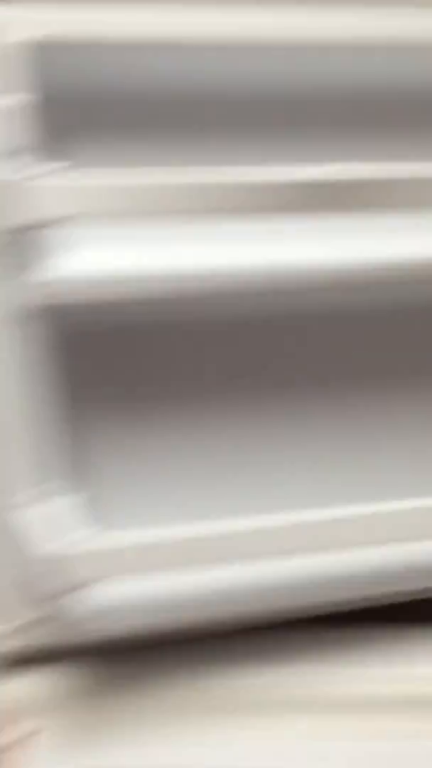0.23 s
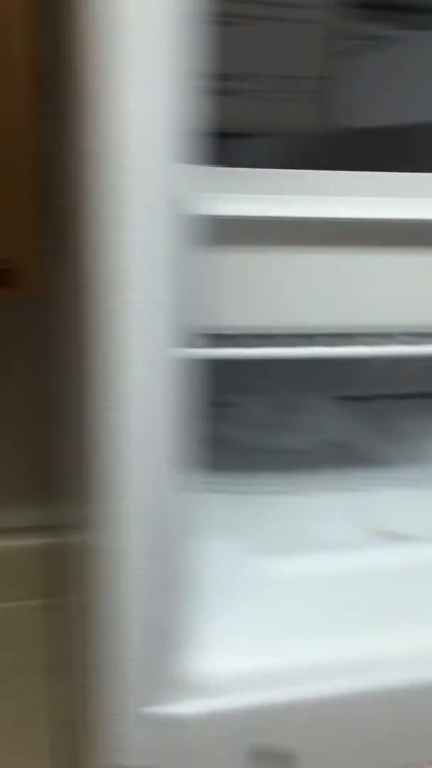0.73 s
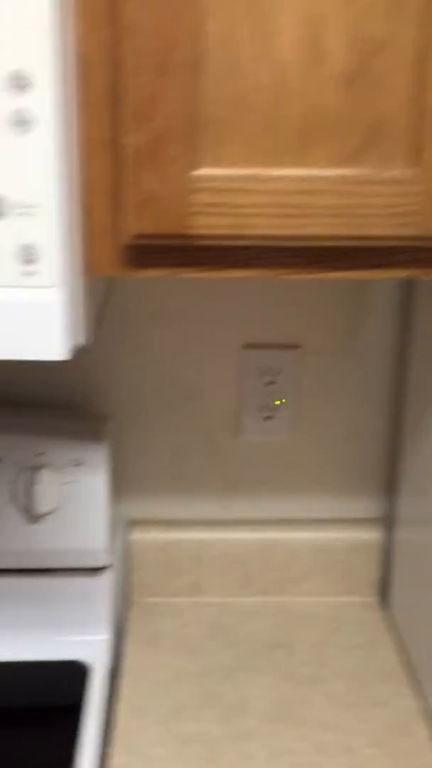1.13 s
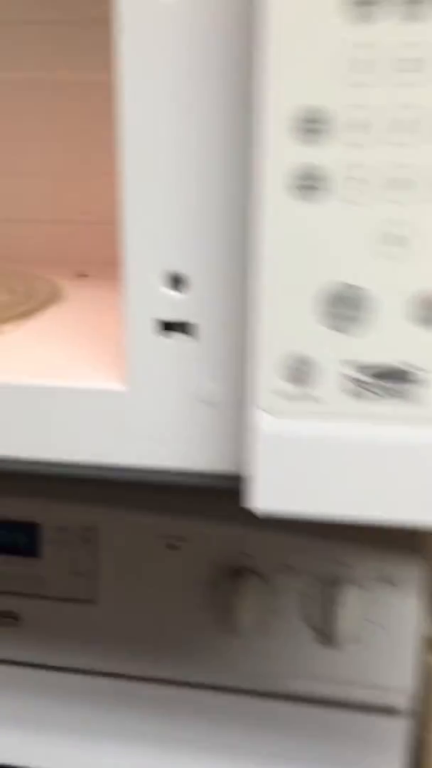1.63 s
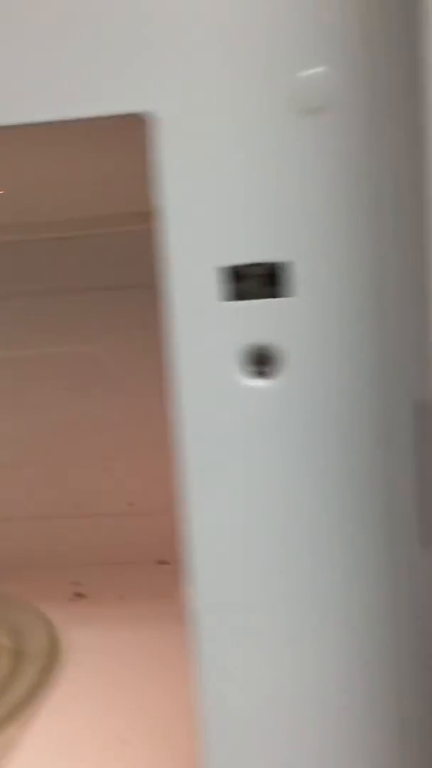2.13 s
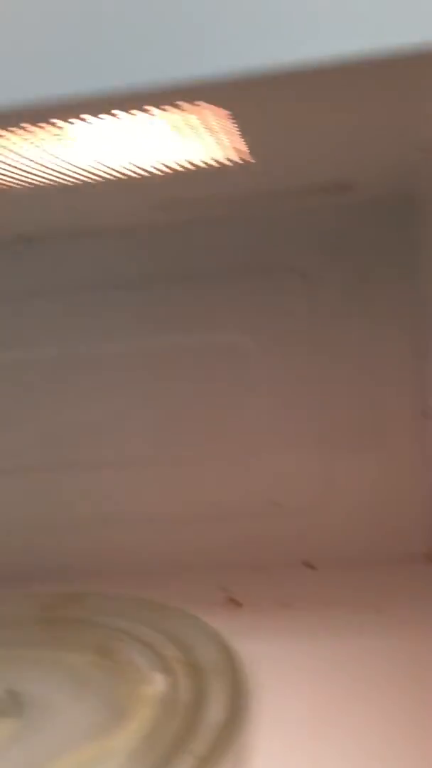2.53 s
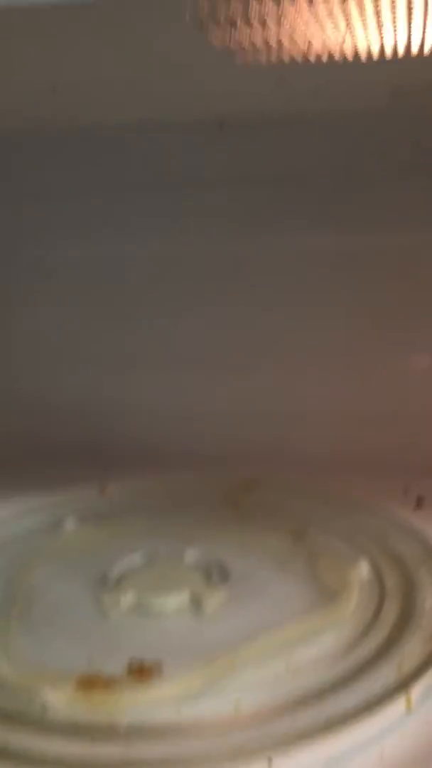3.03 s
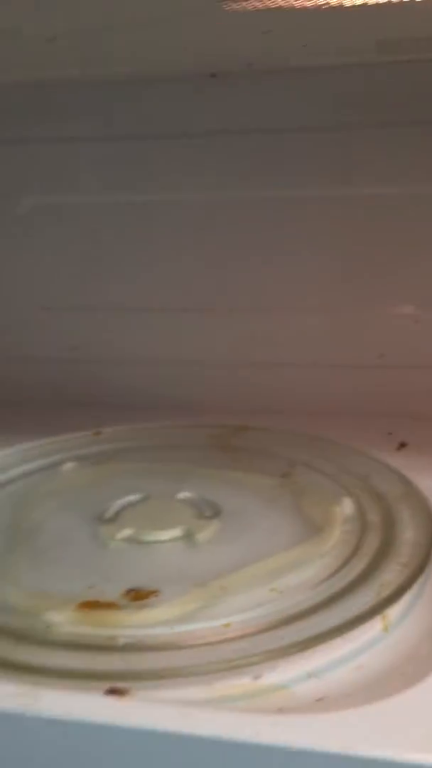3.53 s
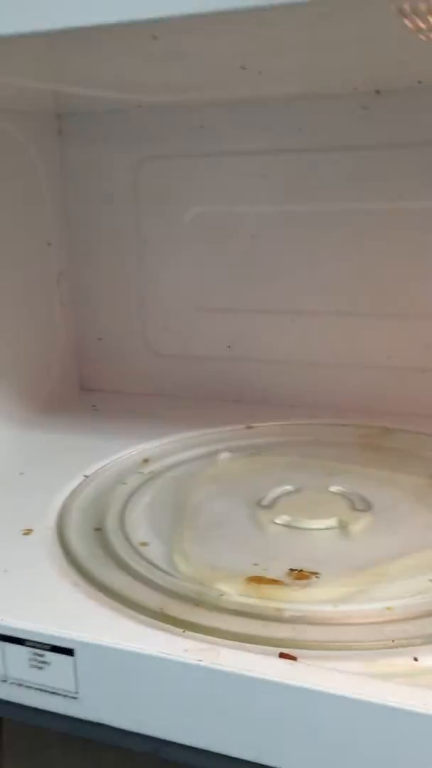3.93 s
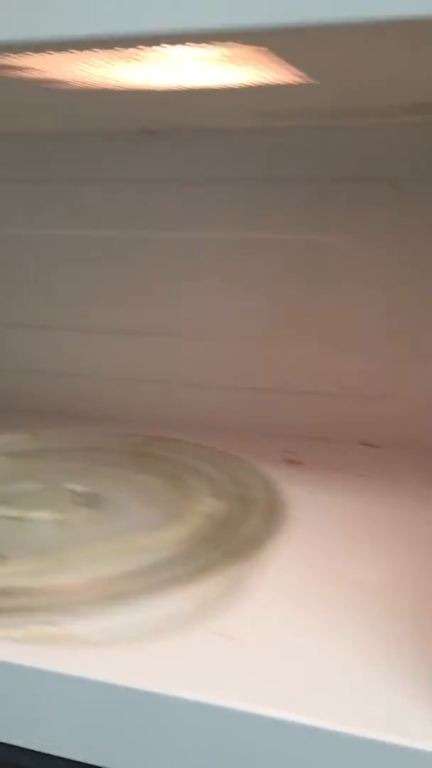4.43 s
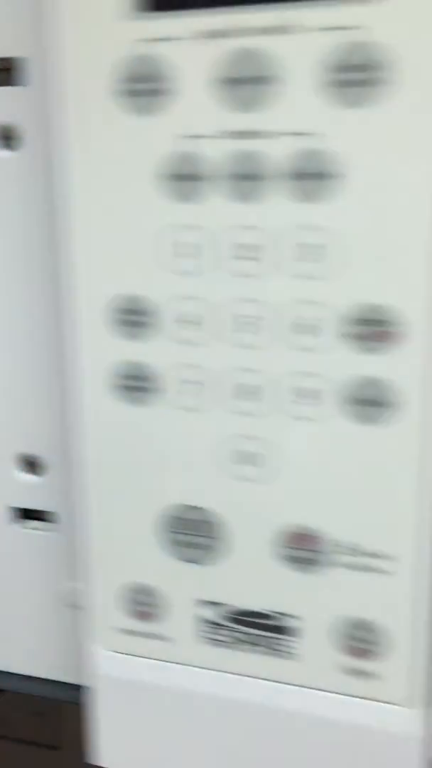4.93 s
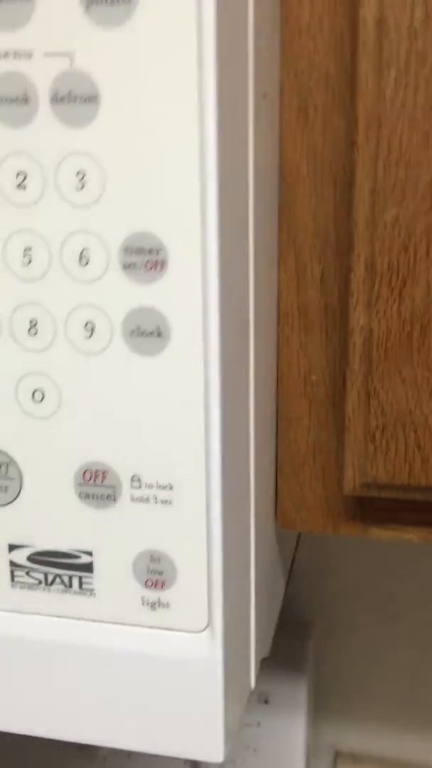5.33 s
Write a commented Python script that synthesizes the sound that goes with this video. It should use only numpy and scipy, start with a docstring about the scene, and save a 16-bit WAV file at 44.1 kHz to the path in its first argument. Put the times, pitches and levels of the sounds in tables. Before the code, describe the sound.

A fridge compressor hums steadily in a bare kitchen. Air from the freezer fan swells briefly past the microphone as a hollow plastic shelf is knocked with a sharp crack. A few light plastic clicks and tiny ticks follow, along with soft, low footsteps. At the end a microwave door slams very close, loud and slightly overloaded, its steel case booming briefly in the hard room.

```python
"""An appliance door, probably a microwave's, slams close by in a bare kitchen: its latch hooks touch, the
impact sets the steel case booming in its modes, the hard room reverberates and the microphone overloads.
Before the slam a freezer fan blows (turbulent noise), a door shelf is knocked, plastic parts click and
steps thud in the floor (damped free vibrations). A compressor hums throughout (forced vibration)."""
import sys
import numpy as np
from scipy import signal
from scipy.fft import rfft, irfft
from scipy.io import wavfile
from scipy.ndimage import uniform_filter1d

SR = 44100
rng = np.random.default_rng(int(sys.argv[2]) if len(sys.argv) > 2 else 0)


def generate_wav(signal):
    """Clip the signal to [-1, 1] and save it as 16-bit WAV at the path in sys.argv[1]."""
    frames = np.transpose(np.atleast_2d(signal))
    scaled = np.clip(frames, -1, 1) * 32767
    pcm = np.round(scaled).astype(np.int16)
    wavfile.write(sys.argv[1], SR, pcm)


N = 245637

# reverberation time of the kitchen: (frequency [Hz], t60 [s])
KITCHEN_T60 = [(80, 1), (250, 0.64), (700, 0.47), (2000, 0.31), (5000, 0.35), (9000, 0.25), (15000, 0.4)]
# compressor rumble and room tone: (frequency [Hz], relative spectral density [dB])
ROOM_TONE_SPECTRUM = [(15, -51), (25, -21), (35, -24), (48, -4.5), (86, -5), (122, -2), (148, -13),
                      (267, -6.5), (457, -18), (666, -18.5), (762, -23), (1050, -19.5), (1240, -25),
                      (2170, -35.5), (15500, -52)]
# nearness of the compressor: (time [s], gain [dB])
COMPRESSOR_NEARNESS = [(0, 3.5), (.6, 6), (1.3, 2), (3.9, -3.5), (5.1, 2.5)]
# hum of the compressor and the panels it shakes: (frequency [Hz], level [dB], waver [0-1])
HUM_LINES = [(56.5, -59, 0.26), (117.6, -62, 0.37), (219.4, -64.5, 0.87), (268.8, -62.5, 0.46),
             (305.4, -69, 0.95), (374, -68.5, 0.56), (430, -67, 0.67), (486, -74, 0.65), (543, -73, .5),
             (650, -74.5, 0.06), (707, -73, 0.54), (1044, -74.5, 0.98), (1150, -74, 0.95)]
# air from the freezer fan: (frequency [Hz], relative spectral density [dB])
FAN_SPECTRUM = [(30, -4), (55, 4.5), (90, -11), (135, 8.5), (240, 13.5), (330, 6.5), (435, 9), (520, -2),
                (750, -5), (1200, 3), (2300, -4), (3300, -11.5), (4700, -20.5), (6500, -23), (15000, -32.5)]
# footfalls: (time [s], gain [dB], pitch factor [ratio])
STEPS = [(2.72, -8.5, 0.5), (2.959, 1, 0.97), (3.32, -5, 0.5), (3.419, -6.5, 0.51), (3.861, -12, 0.53)]
# modes of the floor: (base frequency [Hz], level [dB], t60 [s])
FLOOR_MODES = [(83, -48, 0.77), (156.8, -41, 0.63), (189, -39.5, 0.41), (237.5, -31.5, 0.12)]
# blows on a small hard catch: (time [s], gain [dB])
CATCH_BLOWS = [(1.594, -4.5), (2.109, -1.5)]
# modes of the catch: (frequency [Hz], level [dB], t60 [s])
CATCH_MODES = [(4150, -51, .025), (4520, -51, .03), (6370, -56, .025)]
# modes of a plastic part: (frequency [Hz], level [dB], t60 [s])
PLASTIC_MODES = [(1725, -47, 0.14), (1835, -42.5, 0.081), (2176, -48, 0.12), (3580, -48.5, 0.056),
                 (5660, -49, .028)]
# light contacts on plastic: (time [s], level [dB], bass skirt [dB], treble edge [Hz], t60 [s])
CLICKS = [(.939, -28.5, -14, 4160, 0.021), (.950, -43.5, -4, 18000, 0.17), (1.626, -41.5, -25, 2500, 0.02),
          (2.109, -46, -4, 3000, 0.083), (2.1454, -34, -10, 7800, 0.057), (2.36, -46.5, -2, 4800, 0.043),
          (2.9504, -48.5, 0, 6000, 0.07), (2.9556, -39.5, -2.5, 6550, 0.029),
          (4.781, -45.5, 7.5, 4200, 0.056)]
# a sharp crack, then a deeper one as the shelf seats: (time [s], level [dB], resonance [Hz])
SHELF_CRACKS = [(.7439, -25.5, 2180), (.7473, -25.5, 807)]
# modes of the hollow door shelf: (frequency [Hz], level [dB], t60 [s])
SHELF_MODES = [(224.3, -38.5, 0.27), (379.6, -23, 0.19), (486, -36, 0.17), (696, -35, 0.18),
               (990, -49, .13), (1200, -36, 0.19), (1540, -51, 0.12), (2315, -19.5, 0.028)]
# latch hooks, then slam and rattle: (time [s], level [dB])
DOOR_BLOWS = [(5.3339, -14.5), (5.3429, -15.5), (5.3515, -5.5), (5.3546, -1), (5.3576, -3), (5.3645, -17),
              (5.372, -7), (5.439, -23)]
# dense ring of the door's plastic and glass: (frequency [Hz], relative spectral density [dB])
DOOR_SPECTRUM = [(40, -11), (110, 5.5), (190, 10.5), (300, 2.5), (450, 0.5), (550, -4), (650, 5), (820, -2),
                 (1100, -2.5), (1400, 0), (2000, -1), (3100, -10), (4300, -10), (7000, -12.5),
                 (9500, -16.5), (15000, -27)]
# modes of the door and steel case: (frequency [Hz], level [dB], t60 [s])
CASE_MODES = [(46.2, -19, 0.33), (69.5, -6.5, 0.23), (83, -3, 0.14), (98.4, -6, 0.21), (126.3, -15, 0.56),
              (168.9, -11.5, .35), (183, -15.5, 0.42), (199.3, -11, 0.37), (240, -21.5, 0.45),
              (272, -13, 0.33), (312, -24, .3), (348, -20.5, 0.29), (392, -21, 0.27), (642, -21.5, 0.23),
              (715, -25, 0.24), (1220, -23, 0.16), (1373, -20.5, 0.18), (1420, -0.5, 0.032),
              (1660, -24, 0.17), (1850, -29, 0.16), (2045, -25, 0.22), (2630, -25, 0.13), (4420, -27, .12),
              (5250, -17, 0.06), (6980, -23, 0.11)]


def amp(db):
    """Amplitude ratio of a level in decibels."""
    return 10 ** (np.asarray(db) / 20)


def unit(x):
    """Normalisation to rms 1."""
    return x / np.sqrt(np.mean(abs(x) ** 2) + 1e-20)


def read(points, hz):
    """Interpolation of (frequency [Hz], value) points on a log-frequency axis."""
    f, value = np.transpose(points)
    return np.interp(np.log(hz + 1), np.log(f + 1), value)


def add(mix, start_s, sound):
    """Superposition: a sound joins the mix at start_s."""
    part = mix[round(start_s * SR):][:len(sound)]
    part += sound[:len(part)]


def decay(t, t60):
    """Exponential damping: the level falls 60 dB in t60 seconds."""
    return np.exp(-np.log(1000) * t / t60)


def noise(spectrum):
    """Spectral shaping: white noise filtered to a tabulated spectrum, at rms 1."""
    gain = amp(read(spectrum, np.fft.rfftfreq(N, 1 / SR)))
    return unit(irfft(rfft(rng.standard_normal(N)) * gain, N))


def burst(colour_db, t60):
    """Modal overlap: countless close modes struck at once merge into decaying, coloured noise."""
    t, hz = np.arange(SR // 5) / SR, np.fft.rfftfreq(SR // 5, 1 / SR)
    fade = decay(t, t60)
    spectrum = rfft(rng.standard_normal(len(t)) * fade)
    ripple = np.sqrt(uniform_filter1d(abs(spectrum) ** 2, size=40))
    cepstrum = irfft(np.log(amp(colour_db(hz)) / ripple))
    # minimum phase: nothing sounds before the blow
    causal_filter = np.exp(rfft(cepstrum * (1 + np.sign(np.fft.fftfreq(len(t))))))
    return unit(irfft(spectrum * causal_filter)) * np.sqrt(np.mean(fade ** 2))


def ring(modes, attack_cycles, pitch=1):
    """Free vibration: each mode is a damped sinusoid that swells over its first cycles."""
    t = np.arange(SR) / SR
    return sum(amp(db) * decay(t, t60) * np.sin(2 * np.pi * hz * pitch * t)
               * (1 - np.exp(-t * hz / attack_cycles)) for hz, db, t60 in modes)


def click(resonance_hz, bass_db, treble_db, edge_hz, t60, width_octaves=0.67, fall_db_per_octave=4):
    """Impact excitation: a contact on plastic drives a broad resonance over bass and treble skirts."""
    def colour(hz):
        octaves = np.log2((hz + 1) / resonance_hz)
        resonance = np.exp(-(octaves / width_octaves) ** 2)
        skirt_db = np.where(octaves > 0, treble_db - fall_db_per_octave * octaves, bass_db)
        contact = 1 / (1 + (hz / edge_hz) ** 4)  # a softer contact excites less treble
        return 20 * np.log10(contact * (resonance + amp(skirt_db)))
    return burst(colour, t60)


def kitchen(x, first_echo_s=0.00078, build_s=0.0015):
    """Reverberation: reflections build after the nearest wall answers; each band decays at its own rate."""
    t, hz = np.arange(SR) / SR, np.fft.rfftfreq(SR, 1 / SR)
    reflections = rfft(rng.standard_normal(SR) * (rng.random(SR) < .15))
    centres, t60s = np.transpose(KITCHEN_T60)
    tail = sum(irfft(reflections * read(np.c_[centres, band], hz), SR) * decay(t, t60)
               for band, t60 in zip(np.eye(len(centres)), t60s))
    tail *= 1 - np.exp(-np.maximum(t - first_echo_s, 0) / build_s)
    return signal.fftconvolve(x, tail / np.linalg.norm(tail))[:N]


def standing_waves(x, depth_db=2.5):
    """Interference: a steady sound shifts in colour as the microphone crosses the room's standing waves."""
    spectrogram = signal.stft(x, nperseg=2048)[2]
    patches = uniform_filter1d(rng.standard_normal(spectrogram.shape), size=6, axis=0)
    patches = unit(uniform_filter1d(patches, size=9, axis=1))
    return unit(signal.istft(spectrogram * amp(depth_db * patches), nperseg=2048)[1][:N])


def compressor(waver_hz=5, tone_db=-53.5, hiss_from_hz=2500):
    """Forced vibration: wavering hum and rumble swell with nearness; the faint hiss stays steady."""
    t, hz = np.arange(N) / SR, np.fft.fftfreq(N, 1 / SR)
    white = rng.standard_normal(N) + 1j * rng.standard_normal(N)
    drift = unit(np.fft.ifft(np.fft.fft(white) / (1 + (hz / waver_hz) ** 2)))
    hum = np.zeros(N)
    for line_hz, db, waver in HUM_LINES:
        sway = np.sqrt(1 - waver ** 2) + waver * np.roll(drift, rng.integers(N))
        carrier = np.exp(2j * np.pi * (line_hz * t + rng.random()))
        hum += amp(db) * unit((sway * carrier).real)
    tone = amp(tone_db) * standing_waves(noise(ROOM_TONE_SPECTRUM))
    rumble = signal.sosfiltfilt(signal.butter(2, hiss_from_hz, fs=SR, output="sos"), tone)
    hiss = tone - rumble
    nearness = amp(np.interp(t, *np.transpose(COMPRESSOR_NEARNESS)))
    return nearness * (hum + rumble) + hiss


def freezer_fan(closest_s=0.76, direct_db=-47, diffuse_db=-65.5, approach_s=0.43, leave_s=0.18):
    """Spherical spreading: the rush of air falls as 1/distance to the level of the diffuse field."""
    t = np.arange(N) / SR - closest_s
    distance = np.hypot(1, t / np.where(t < 0, approach_s, leave_s))  # 1 as the microphone passes
    level = np.hypot(amp(direct_db) / distance, amp(diffuse_db))
    return level * standing_waves(noise(FAN_SPECTRUM))


def footsteps(room_db=-12):
    """Structure-borne sound: each step booms softly in the low modes of the floor."""
    direct = np.zeros(N)
    for s, db, pitch in STEPS:
        add(direct, s, amp(db) * ring(FLOOR_MODES, attack_cycles=1.5, pitch=pitch))
    return direct + amp(room_db) * kitchen(direct)


def catch_pings(room_db=-2):
    """Free vibration: a small hard catch has high, quickly damped modes."""
    direct = np.zeros(N)
    for s, db in CATCH_BLOWS:
        add(direct, s, amp(db) * ring(CATCH_MODES, attack_cycles=2.8))
    return direct + amp(room_db) * kitchen(direct)


def plastic_clicks(resonance_hz=1675, treble_db=-6.5, twang_s=2.9565, room_db=-2.5, twang_room_db=-12):
    """Resonance: light contacts share one broad peak; one leaves a plastic part twanging."""
    clicks, twang = np.zeros((2, N))
    for s, db, bass_db, edge_hz, t60 in CLICKS:
        add(clicks, s, amp(db) * click(resonance_hz, bass_db, treble_db, edge_hz, t60))
    add(twang, twang_s, ring(PLASTIC_MODES, attack_cycles=3))
    return clicks + twang + kitchen(amp(room_db) * clicks + amp(twang_room_db) * twang)


def shelf_knock(ring_s=.7445, crack_room_db=-7.5, body_room_db=-12):
    """Impulse response: the hollow shelf cracks twice close by and rings on in its modes."""
    cracks, body = np.zeros((2, N))
    for s, db, resonance_hz in SHELF_CRACKS:
        add(cracks, s, amp(db) * click(resonance_hz, bass_db=-1, treble_db=-8.5, edge_hz=10000, t60=0.047))
    add(body, ring_s, ring(SHELF_MODES, attack_cycles=2.3))
    return cracks + body + kitchen(amp(crack_room_db) * cracks + amp(body_room_db) * body)


def door_slam(slam_s=5.3518, blows_db=-3, room_db=-3, case_room_db=-20, latch_bass_db=-15):
    """Impact excitation: latch and door strike in quick succession; the main blow sets the case booming."""
    blows, case = np.zeros((2, N))
    for s, db in DOOR_BLOWS:
        # a full blow (0 dB) is bright and short; lighter ones are duller and leave the parts free to ring
        tilt_db_per_octave = -0.33 + 0.08 * db
        t60 = 0.025 * 2 ** (-db / 14.5)
        bass_db = latch_bass_db * np.clip(-db / 12, 0, 1)  # light touches hardly move the heavy panel

        def colour(hz):
            treble_db = tilt_db_per_octave * np.log2(np.maximum(hz / 1500, 1))
            return read(DOOR_SPECTRUM, hz) + treble_db + bass_db / (1 + (hz / 1000) ** 2)
        add(blows, s, amp(db + blows_db) * burst(colour, t60))
    add(case, slam_s, ring(CASE_MODES, attack_cycles=0.53))
    return blows + case + kitchen(amp(room_db) * blows + amp(case_room_db) * case)


def scene():
    """Superposition: the pressures of all sources add at one microphone."""
    impacts = door_slam() + shelf_knock() + plastic_clicks() + catch_pings() + footsteps()
    return (impacts + freezer_fan() + compressor())[None]


def record(dry, low_cut_hz=40, ceiling=.72, band_edge_hz=15500):
    """Saturation and band limiting: the microphone rounds the slam's peaks and loses both band ends."""
    x = signal.sosfilt(signal.butter(4, low_cut_hz, "highpass", fs=SR, output="sos"), dry)
    saturated = x / (1 + (x / ceiling) ** 6) ** (1 / 6)
    lowpass = signal.firwin(511, band_edge_hz, window=("kaiser", 9), fs=SR)
    return signal.oaconvolve(saturated, lowpass[None], "same")


dry = scene()
out = record(dry)
generate_wav(out)
```